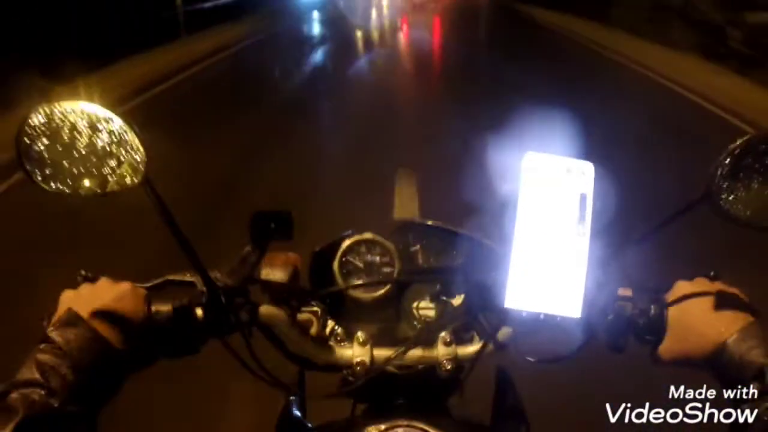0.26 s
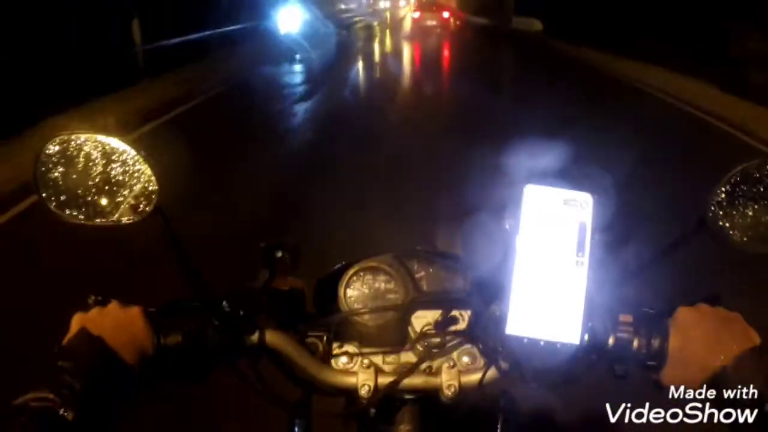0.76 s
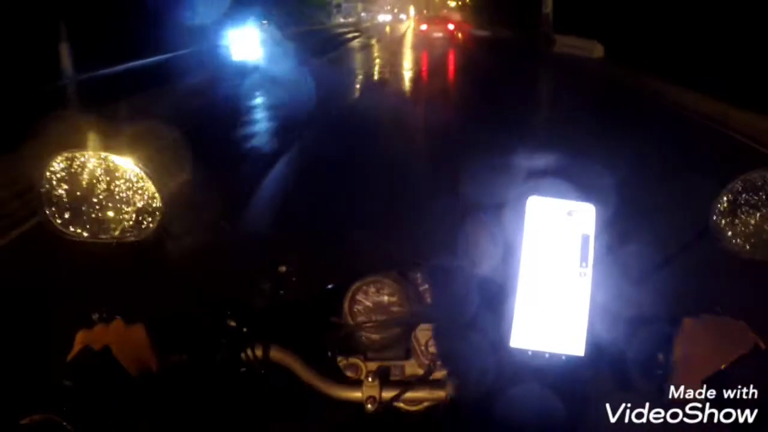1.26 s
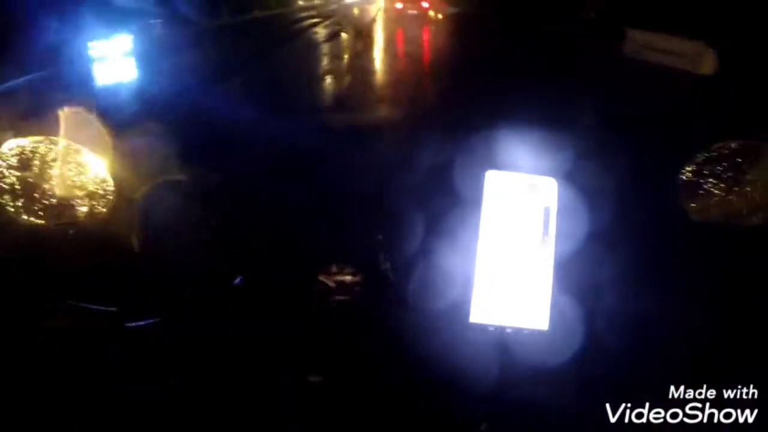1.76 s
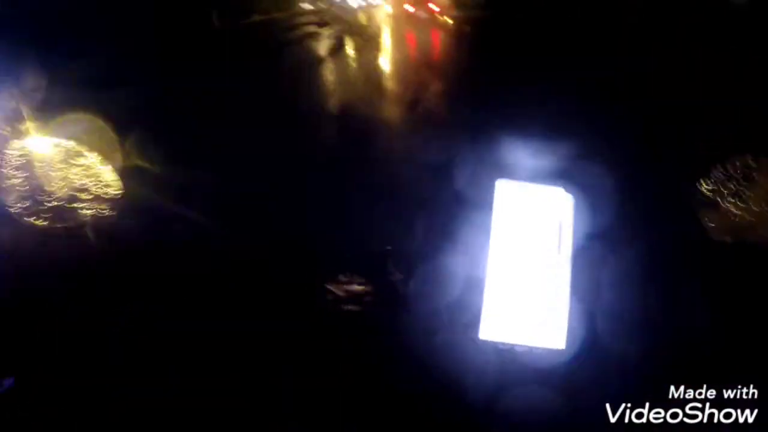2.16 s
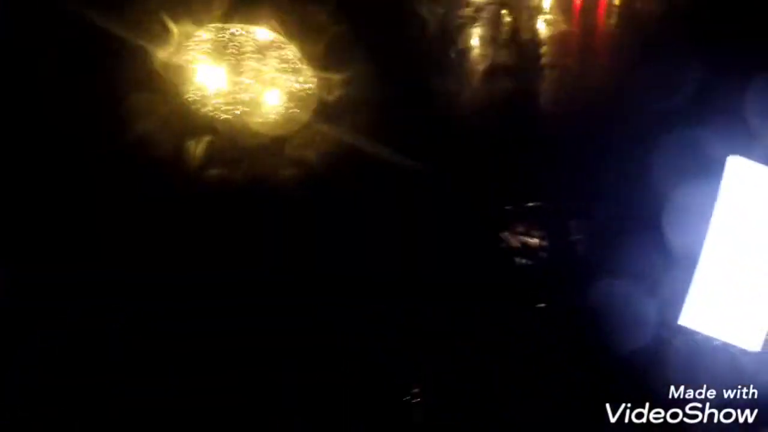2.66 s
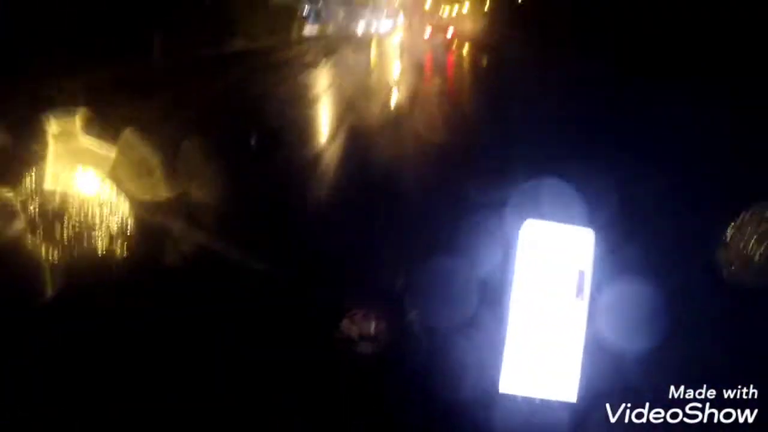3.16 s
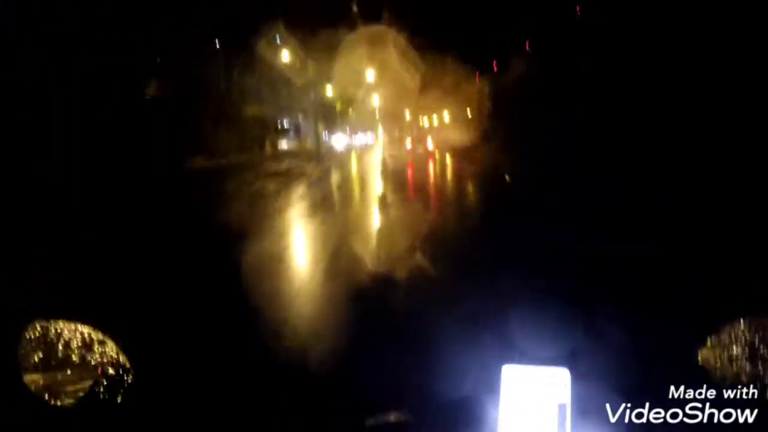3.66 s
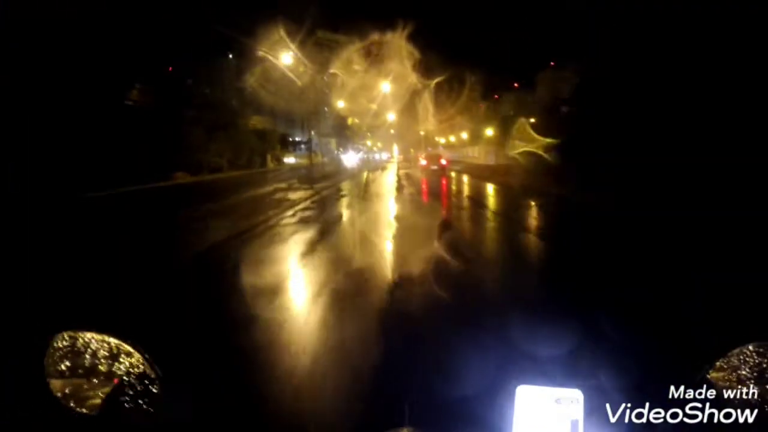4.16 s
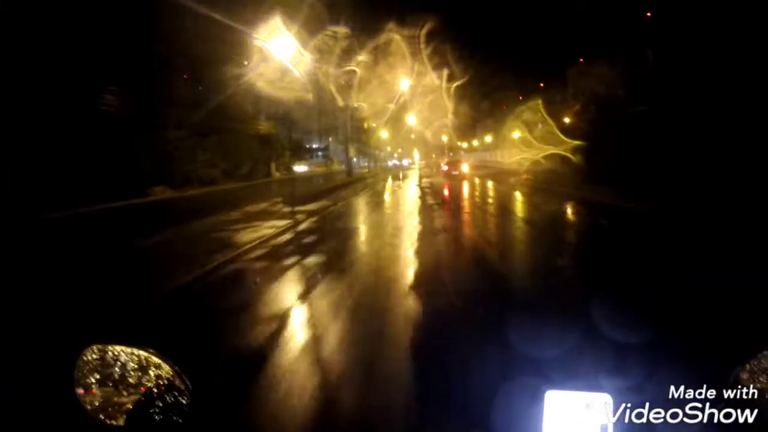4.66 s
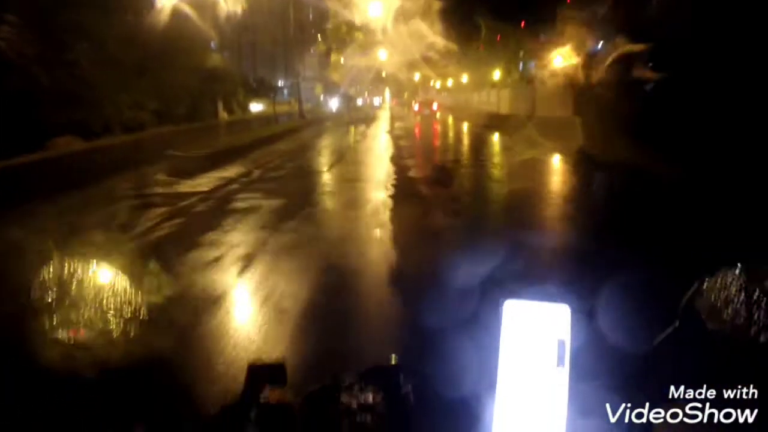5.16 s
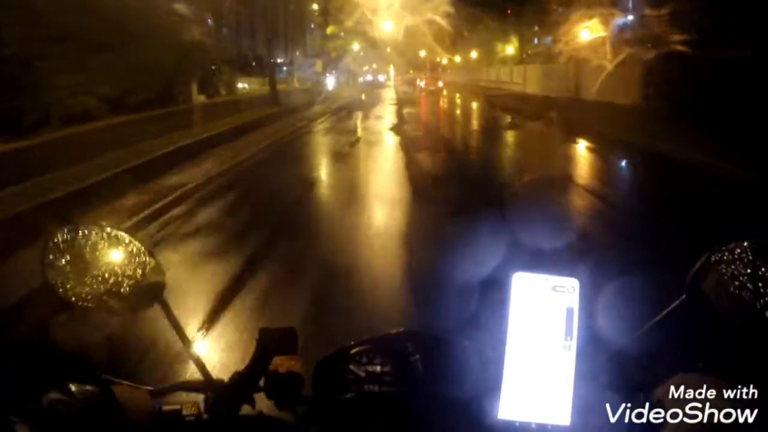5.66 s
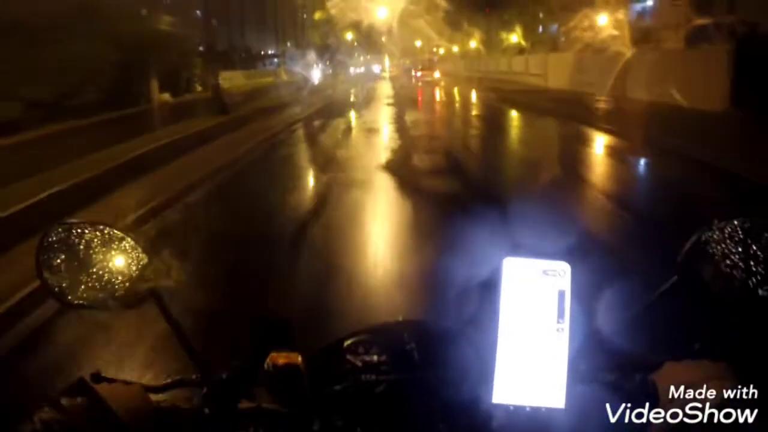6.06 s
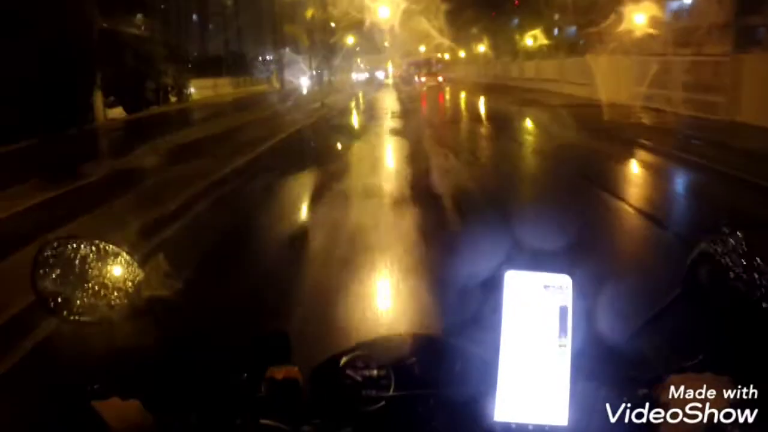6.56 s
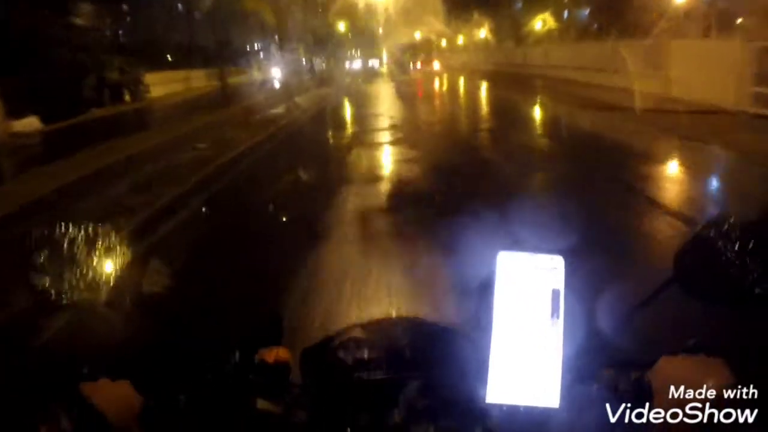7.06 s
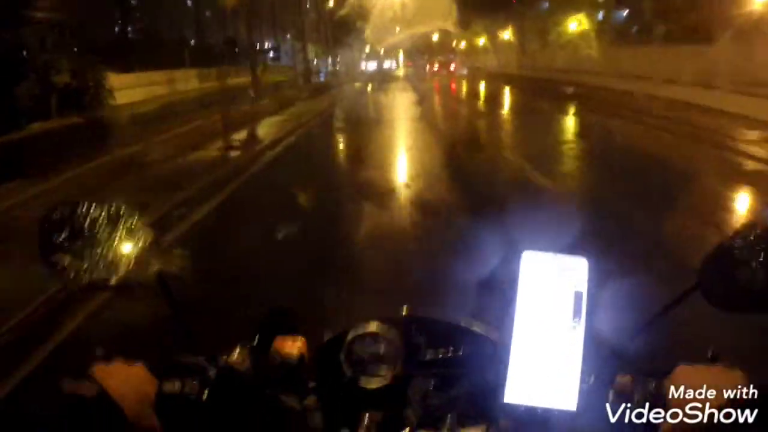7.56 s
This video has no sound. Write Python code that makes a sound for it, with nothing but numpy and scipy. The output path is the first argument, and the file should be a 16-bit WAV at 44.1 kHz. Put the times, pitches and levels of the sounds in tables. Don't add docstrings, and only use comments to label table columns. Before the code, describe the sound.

A motorcycle is already moving along a wet road, heard through a small sealed microphone shell on the rider's helmet. From 0 to 2 s a very deep, slightly rough engine drone surges strongly, mixed with low wind thumps, hollow booms and fluttering buffets. Above it lie a muffled, resonant air rush, a thin unsteady whine and faint tyre spray hiss. From 2 s the speed rises, with a brief low hoot and fuller rush near 2.6 s and wetter hiss around 3 s. Between 3.6 and 5.3 s the narrow, breathy seam whistle swells and wavers, with shorter higher glints. It dips near 5.5 s, then a heavy gust thumps at 5.9 s. A strong engine surge follows at 6.4 s, a small splash and tiny squeak at 6.6 s. Whistling flares near 7.2 and 7.5 s, over continuing drone, buffeting and a low visor hum, without stopping.

```python
import sys
import numpy as np
from scipy import signal
from scipy.fft import rfft, irfft, next_fast_len
from scipy.io import wavfile
from scipy.ndimage import uniform_filter1d

SR = 44100
rng = np.random.default_rng(int(sys.argv[2]) if len(sys.argv) > 2 else 0)


def invert_db(x):
    u = np.asarray(x, float) / 20
    return 10 ** u


def persist_wave(psi):
    counts = np.round(np.clip(psi, -1, 1) * 32767).astype(np.int16)
    wavfile.write(sys.argv[1], SR, np.atleast_2d(counts).T)


N = 344421

# (time [s], seam turned into the wind [0-1], speed gained [0-1])
RIDE = [(0, 0.3, 0), (.4, 0.07, 0.06), (1.9, 0.2, 0.48), (2.5, 0.43, 0.61), (2.75, 0.87, 0.55),
        (3.2, 0.13, 0.67), (3.6, 0.76, 0.47), (4.5, 1, 0.63), (5.25, 0.83, 0.7), (5.5, 0.06, 0.73),
        (6.3, 0, 0.98), (6.65, 0.12, 0.85), (7.0, 0.01, 0.88), (7.81, 0.25, 1)]

# (level at the start [dB], rise when turned into the wind [dB],
# rise at speed [dB])
DRONE_BED = (-48, 0.1, 0.1)
THUMP_BED = (-35.5, 0.1, -8)
BUFFET_BED = (-39.5, 0.1, 6.2)
BOOM_BED = (-43, 0.1, 3.2)
RUSH_BED = (-45.5, 0.1, 2.1)
CAVITY_BED = (-41.5, 0.39, 2.73)
RING_BED = (-43.5, 1.57, 0.47)
VISOR_BED = (-51.5, 0.3, 4.1)
SPRAY_BED = (-66, -0.6, -0.5)
MIST_BED = (-74, 3.3, -2)
GLINT_BED = (-51, 1, 1)

# (time [s], half length [s], pitch [Hz], level [dB])
SQUEAK_EVENTS = [
    (2.2, 0.2, 11600, -86),
    (6.58, 0.04, 11800, -81),
]
# (time [s], half length [s], peak level [dB])
GLINT_SWELLS = [(.4, 0.036, -60), (.85, .1, -56), (1.799, .05, -50), (2.75, .12, -53), (2.9, .03, -57),
                (3.07, 0.028, -51), (3.419, .04, -54), (3.68, 0.1, -49), (3.971, 0.051, -53),
                (4.283, 0.16, -48), (4.7, .13, -49), (5.0, .04, -54), (5.2, .04, -52), (5.4, .04, -56),
                (5.863, .07, -50), (6.301, .05, -53), (6.45, .04, -53), (6.681, 0.088, -56),
                (7.1, 0.046, -47), (7.3, .06, -54), (7.501, .05, -57)]

# (frequency [Hz], density [dB per Hz])
HISS_SPECTRUM = [(2500, -8.5), (3600, -8.5), (5200, -3.5), (6300, -7.5), (6700, -13.5), (7600, -11),
                 (9500, -20), (10400, -25.5), (12000, -25.5), (12900, -32.5), (14000, -34), (15100, -35)]
# (time [s], half length [s], peak level [dB])
WET_STRETCHES = [
    (0.047, 0.17, -69),
    (.85, 0.2, -73),
    (2.171, .15, -70),
    (2.95, 0.46, -70),
    (5.1, 0.088, -72),
    (6.652, 0.14, -71),
    (7.75, 0.18, -75),
]
# (time [s], half length [s], level change [dB])
SPLASHES = [(1.14, 0.019, 3.5), (2.0, .03, 1), (2.199, .04, 1), (2.62, .02, -2), (2.675, 0.032, 3.5),
            (2.801, .05, 1.5), (3.344, 0.024, -5), (3.996, .012, -6), (4.853, 0.045, -6.5),
            (4.956, .03, -1), (5.056, 0.012, 3), (6.58, 0.02, 5)]

# (frequency [Hz], width [Hz], level [dB], rise when turned into the wind [dB],
# rise at speed [dB])
SHELL_MODES = [(256.6, 21.5, -0.5, -3.5, 1.5), (312.5, 32, -5, -1, 6), (531.4, 14, -7.5, 2, -4),
               (657, 86, -9, -5.5, 1.5), (929, 99, -10.5, 0, 1), (1486, 124, 3, -3.5, -1),
               (1900, 420, -3.5, 1.5, 7), (2137, 160, -7.5, 4.5, 3), (2305, 72, -11, -0.5, 1),
               (2636, 134, -3, 0.5, -0.5), (2367, 240, -2, 7.5, -7.5), (2918, 86, -14.5, 4, 10),
               (3070, 100, -1.5, -0.5, -4), (3344, 370, -3.5, 2, -9), (4030, 81, -21, 13, 1),
               (4680, 97, -11, -1, -3.5), (4810, 200, -12.5, 2.5, -1), (5100, 140, -17.5, 5.5, -1.5),
               (5550, 160, -21, 12, 0), (6120, 220, -16, -2.5, -1.5)]
# (time [s], low tone [Hz], low level [dB], high tone [Hz], high level [dB])
SEAM_TONES = [(0, 1308, -10, 1382, 0), (.6, 1276, -9.5, 1388, -10), (1.15, 1275, -4, 1350, -8.5),
              (1.5, 1262, -13, 1350, -4), (2.1, 1323, -10, 1363, -5.5), (2.4, 1296, -18, 1377, -1.5),
              (3.0, 1300, -23, 1359, -6.5), (3.45, 1345, -10, 1367, -4), (3.62, 1335, 2, 1362, -6),
              (3.76, 1300, 7, 1370, 3), (3.9, 1268, 2, 1365, -3), (4.2, 1264, -0.5, 1353, -4),
              (4.45, 1290, 5, 1370, -6), (4.8, 1299, 3.5, 1372, 0), (5.0, 1289, 0, 1367, -10),
              (5.13, 1305, 5.5, 1380, -15), (5.3, 1312, -2, 1365, -2), (5.5, 1253, -3.5, 1368, -6),
              (5.85, 1264, 6.5, 1380, 4), (6.0, 1285, 1, 1368, -2), (6.1, 1326, 3, 1375, -7),
              (6.35, 1316, 0, 1365, 1.5), (6.6, 1300, -9, 1385, -9), (6.85, 1305, 1, 1370, -3),
              (7.0, 1255, -2, 1376, -8), (7.17, 1330, 5, 1381, -6), (7.3, 1339, 1.5, 1370, -1),
              (7.55, 1337, 4, 1391, 2), (7.68, 1323, -2, 1393, 7.5), (7.81, 1347, 3, 1377, 3)]
# (time [s], half length [s], peak level [dB])
FLARES = [(.01, 0.031, -50), (0.222, 0.06, -54), (0.502, 0.031, -53), (1.38, 0.066, -54),
          (3.45, 0.066, -47), (4.158, 0.051, -49), (4.651, 0.019, -48), (4.997, 0.024, -52),
          (2.437, 0.47, -54), (3.243, 0.028, -46), (3.718, 0.12, -42.5), (4.02, 0.036, -47),
          (4.578, 0.39, -46.5), (5.16, 0.12, -42), (5.843, .04, -48), (6.06, 0.43, -47.5),
          (6.346, 0.076, -49), (6.6, 0.024, -48), (6.77, 0.053, -47), (6.864, 0.045, -49),
          (7.16, 0.016, -53), (7.211, 0.1, -42), (7.54, 0.31, -42)]
# (time [s], half length [s], peak level [dB])
HUMS = [(0.142, 0.12, -52), (0.73, 0.044, -45), (1.74, 0.053, -48), (.1, .04, -55), (1.2, 0.037, -54),
        (2.302, 0.034, -51), (2.699, 0.032, -48), (5.0, 0.034, -54), (5.447, 0.056, -52), (4.3, 0.19, -58),
        (6.8, 0.039, -54), (2.559, 0.17, -54.0), (2.89, 0.061, -50), (3.36, 0.14, -60), (3.717, 0.086, -51),
        (5.1, 0.11, -54), (7.13, 0.052, -48)]
# (time [s], pitch [Hz])
HUM_PITCH = [(0, 463), (.35, 456.3), (1.0, 463), (1.5, 458.5), (1.9, 472), (2.5, 473.6), (3.4, 469.6),
             (4.2, 469.5), (4.8, 476), (5.4, 475), (5.9, 483.6), (6.2, 483), (6.5, 471), (6.8, 473.7),
             (7.1, 485), (7.81, 482.7)]

# (frequency [Hz], density [dB per Hz])
BUFFET_SPECTRUM = [(35, -21), (60, 3), (100, 2), (128, -2.5), (150, -12.5), (200, -21)]
# (frequency [Hz], density [dB per Hz])
RUSH_SPECTRUM = [(14, 4), (60, 6.5), (125, 5), (152, 0), (195, 1), (232, -2.5), (300, -4.5), (420, -7.5),
                 (600, -12), (800, -19.5), (1100, -25.5)]
# (time [s], half length [s], peak level [dB])
THUMPS = [(0.3, 0.096, -34), (0.89, 0.072, -29), (1.286, 0.13, -32.5), (2.35, 0.1, -34), (2.69, 0.088, -34),
          (3.26, 0.118, -43), (4.034, 0.076, -31.5), (4.909, 0.12, -36), (5.205, 0.054, -41.5),
          (5.89, 0.31, -27.5), (5.96, 0.06, -27.5), (6.399, 0.084, -44), (6.746, 0.069, -29),
          (7.029, 0.169, -37), (7.23, 0.073, -29), (7.5, 0.06, -34)]
# (time [s], half length [s], peak level [dB])
BUFFETS = [(0.098, 0.14, -36), (0.336, 0.068, -32), (0.544, 0.034, -34), (0.688, 0.083, -34),
           (0.937, 0.058, -34.5), (1.297, 0.074, -33.5), (1.753, 0.35, -35), (2.31, 0.13, -38),
           (2.593, 0.059, -38.5), (3.27, 0.28, -41), (3.776, 0.058, -32), (4.283, 0.063, -42),
           (4.491, 0.48, -34), (5.16, 0.25, -34.5), (5.56, 0.054, -52), (5.839, 0.077, -36.5),
           (6.149, 0.065, -38.5), (6.571, 0.051, -33), (6.741, 0.43, -33.5), (7.254, 0.13, -33.5),
           (7.5, 0.037, -40), (7.677, 0.103, -32)]
# (time [s], half length [s], peak level [dB])
BOOMS = [(.15, .08, -50), (0.748, 0.067, -35), (1.12, 0.037, -48), (2.4, .06, -43), (6.9, .1, -60),
         (1.03, 0.1, -47), (1.45, 0.055, -44.5), (1.85, 0.14, -49.5), (3.153, 0.022, -37),
         (3.432, 0.037, -40), (4.196, 0.21, -42.5), (4.73, 0.11, -38.5), (5.148, 0.048, -36.5),
         (5.39, 0.078, -43.5), (5.621, 0.064, -38.5), (5.846, 0.1, -41), (6.364, 0.27, -36),
         (6.645, 0.042, -37), (6.994, 0.038, -37.5), (7.25, 0.064, -36.5), (7.451, 0.058, -37),
         (7.7, 0.097, -39)]
# (time [s], pitch [Hz])
BOOM_PITCH = [(0, 168), (.7, 174), (1.4, 172), (2.1, 177), (2.5, 165), (3.2, 173), (3.6, 176), (4.3, 175),
              (4.85, 166), (5.2, 174), (5.6, 178), (5.85, 168), (6.15, 167), (6.6, 173), (7.05, 166),
              (7.3, 172), (7.81, 171)]
# (time [s], half length [s], peak level [dB])
HOOTS = [
    (.78, 0.075, -43),
    (2.6, 0.052, -40),
    (4.9, 0.12, -48),
]
# (time [s], half length [s], peak level [dB])
RUSHES = [
    (0.756, 0.051, -57),
    (2.55, 0.11, -49.5),
    (3.237, 0.051, -55),
    (4.85, 0.18, -53),
    (5.828, 0.046, -51),
    (6.75, .12, -59),
    (7.504, .05, -47),
]

# (time [s], pitch [Hz])
FIRING = [(0, 43.9), (.57, 44.6), (.75, 45.9), (1.2, 46.15), (1.32, 43.8), (1.65, 42.2), (1.82, 46.2),
          (2.26, 47.16), (2.6, 42.05), (3.0, 44.95), (3.9, 43.1), (4.3, 46.2), (4.55, 44.96), (4.8, 49.56),
          (5.1, 44.9), (6.1, 46.57), (6.96, 44.3), (7.57, 46.06)]
# (time [s], half length [s], peak level [dB])
SURGES = [(0.163, 0.19, -32), (0.545, 0.072, -24), (0.754, 0.03, -27), (0.975, 0.08, -22),
          (1.303, 0.041, -21), (1.37, 0.091, -30), (1.88, 0.13, -29), (2.07, 0.061, -25),
          (2.24, 0.094, -26.5), (2.49, 0.056, -42), (2.66, 0.045, -28.5), (2.85, 0.076, -32.5),
          (3.27, 0.045, -23), (3.59, 0.41, -32.5), (3.618, 0.044, -33), (4.006, 0.055, -33.0),
          (4.302, 0.06, -30), (4.52, 0.25, -38), (4.85, 0.045, -43), (5.15, 0.14, -32.5),
          (5.552, 0.19, -29.5), (5.84, 0.076, -31), (6.03, 0.074, -30), (6.238, 0.12, -45.5),
          (6.43, 0.083, -20.5), (6.708, 0.13, -29.5), (6.965, 0.041, -24.5), (7.075, 0.12, -28),
          (7.6, 0.22, -28.5), (7.651, 0.038, -32)]

# (time [s], level change [dB])
TREBLE_BLANKS = [
    (2.001, -6),
    (4.708, -24),
    (5.263, -22),
    (5.86, -24),
]


def in_time(rows):
    s, *columns = np.transpose(rows)
    return [np.interp(np.arange(N) / SR, s, c) for c in columns]


def bell(time_s, half_s, power=2):
    return np.exp(-((np.arange(N) / SR - time_s) / half_s) ** power)


def level_of(bed, swells=()):
    turned, speed = in_time(RIDE)
    height = invert_db(bed[0] + bed[1] * turned + bed[2] * speed)
    for time_s, half_s, peak_db in swells:
        height = height + invert_db(peak_db) * bell(time_s, half_s)
    return 20 * np.log10(height)


def rms_one(x):
    return x / np.sqrt(np.mean(x ** 2) + 1e-20)


def drift(rate_hz):
    r = np.exp(-80 * np.pi * rate_hz / SR)
    noise = rng.standard_normal(N // 40 + 2002)
    slow = signal.lfilter([1], [1, -2 * r, r * r], noise)[2000:]
    return np.interp(np.arange(N) / 40, np.arange(len(slow)), rms_one(slow))


def turbulence(spectrum):
    size = next_fast_len(N)
    hz, db = np.transpose(spectrum)
    log_hz = np.log(np.arange(size // 2 + 1) * SR / size + 1e-9)
    colour = invert_db(np.interp(log_hz, np.log(hz), db, left=-200, right=-200))
    return rms_one(irfft(rfft(rng.standard_normal(size)) * colour, size)[:N])


def sung(hz, width_hz, steep=2):
    r = np.exp(-np.pi * width_hz / SR)
    swing = rng.standard_normal((2, N + 4000))
    for _ in range(steep):
        swing = signal.lfilter([1 - r], [1, -r], swing)
    in_phase, quadrature = swing[:, 4000:]
    phase = 2 * np.pi * np.cumsum(hz * np.ones(N)) / SR
    return rms_one(in_phase * np.cos(phase) + quadrature * np.sin(phase))


def evened(x, span_s, share):
    power = uniform_filter1d(x ** 2, int(span_s * SR)) + .02
    return rms_one(x / power ** (np.clip(share, 0, 1) / 2))


def squeaks():
    return sum(invert_db(db) * bell(time_s, half_s) * sung(hz, 900)
               for time_s, half_s, hz, db in SQUEAK_EVENTS)


def glints():
    mode = sung(2325 + 18 * drift(6.02), 75)
    skirt = 0.83 * sung(2200 + 25 * drift(4), 170)
    level_db = level_of(GLINT_BED, GLINT_SWELLS) + 1.3 * drift(30)
    return invert_db(level_db) * evened(mode + skirt, 0.1, share=0.7)


def spray(gusts_db):
    level_db = level_of(SPRAY_BED, WET_STRETCHES) + 0.36 * drift(2.7)
    bright_db = level_of(MIST_BED)
    hiss = turbulence(HISS_SPECTRUM)
    top = signal.sosfiltfilt(signal.butter(2, 9200, "high", fs=SR, output="sos"), hiss)
    brighter = invert_db(bright_db - level_db + 11.5 - 0.4 * gusts_db + 0.6 * drift(14))
    return invert_db(level_db + 8.0 + gusts_db) * (hiss - top + brighter * top)


def shell_rings():
    turned, speed = in_time(RIDE)
    flow, rings = rng.standard_normal((3, N)), 0
    for k, (hz, width_hz, db, turned_db, speed_db) in enumerate(SHELL_MODES):
        r = np.exp(-np.pi * width_hz / SR)
        poles = [1, -2 * r * np.cos(2 * np.pi * hz / SR), r * r]
        mode = signal.lfilter([1, 0, -1], poles, flow[k % 3])
        unsteady_db = 1.05 * drift(2.7) + 0.98 * drift(26.0)
        gain = invert_db(db + turned_db * turned + speed_db * speed + unsteady_db)
        rings = rings + (-1) ** (k // 3) * gain * rms_one(mode)
    return rms_one(rings)


def seam_whistle():
    low_hz, low_db, high_hz, high_db = in_time(SEAM_TONES)
    low = invert_db(low_db) * evened(sung(low_hz + 6 * drift(5.05), 42), 0.052, share=0.79)
    high = invert_db(high_db) * evened(sung(high_hz + 6 * drift(4.48), 37), 0.047, share=0.8)
    cavity = sung(1325, 230) + invert_db(-2.0) * (low + high)
    cavity = cavity / np.sqrt(uniform_filter1d(cavity ** 2, SR // 2))
    level_db = level_of(CAVITY_BED, FLARES) + 0.51 * drift(7.3)
    return invert_db(level_db + 0.62) * evened(cavity, 0.1, share=0.73)


def visor_hum():
    hum = sung(in_time(HUM_PITCH)[0] + 3 * drift(2.57), 23.2) + 0.46 * sung(505, 73)
    level_db = level_of(VISOR_BED, HUMS) + drift(3.7)
    return invert_db(level_db) * evened(hum, 0.14, share=0.76)


def shell(gusts_db):
    rings = invert_db(level_of(RING_BED) + 2.5 + 0.44 * gusts_db) * shell_rings()
    treble_slope = signal.butter(4, 6600, fs=SR, output="sos")
    return signal.sosfilt(treble_slope, rings + seam_whistle() + visor_hum())


def helmet_boom():
    tone = sung(in_time(BOOM_PITCH)[0], 19.0) + 0.5 * sung(190, 42)
    boom = invert_db(level_of(BOOM_BED, BOOMS) + 1.07) * evened(tone, 0.082, share=1.0)
    hoot = invert_db(level_of((-70, 0, 0), HOOTS)) * evened(sung(262, 25), 0.095, share=0.8)
    return boom + hoot


def wind():
    thump_gain = invert_db(level_of(THUMP_BED, THUMPS)) + invert_db(-44)
    thump = thump_gain * evened(sung(25, 27.7), 0.31, share=0.32)
    buffet_db = level_of(BUFFET_BED, BUFFETS) - 0.07
    buffet = invert_db(buffet_db) * evened(turbulence(BUFFET_SPECTRUM), 0.12, share=0.82)
    rush_db = level_of(RUSH_BED, RUSHES) + 1.3 * drift(5.0) + 6.5
    return thump + buffet + helmet_boom() + invert_db(rush_db) * turbulence(RUSH_SPECTRUM)


def engine():
    (hz,) = in_time(FIRING)
    phase = 2 * np.pi * np.cumsum(hz + 1.295 * drift(6.6)) / SR
    rough = 0.24 * sung(hz, 25.0)
    level_db = level_of(DRONE_BED, SURGES) + drift(52)
    return invert_db(level_db) * rms_one(np.sqrt(2) * np.sin(phase) + rough)


def scene():
    splash_db = sum(db * bell(time_s, half_s) for time_s, half_s, db in SPLASHES)
    gusts_db = .5 * drift(45) + 0.87 * drift(56) + splash_db
    background = squeaks() + glints() + spray(gusts_db)
    return (background + shell(gusts_db) + wind() + engine())[None]


def band_limit(x):
    return signal.sosfilt(signal.butter(12, 15000, fs=SR, output="sos"), x)


def record(dry):
    x = signal.sosfilt(signal.butter(2, 14, "high", fs=SR, output="sos"), dry)
    x = .42 * np.tanh(x / .42)
    treble_band = signal.butter(6, [8600, 13000], "band", fs=SR, output="sos")
    treble = signal.sosfiltfilt(treble_band, x)
    blank_db = sum(db * bell(time_s, 0.0083, power=4) for time_s, db in TREBLE_BLANKS)
    mix = x + (invert_db(blank_db) - 1) * treble
    return band_limit(mix)


dry = scene()
out = record(dry)
persist_wave(out)
```